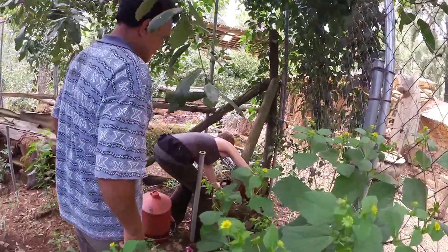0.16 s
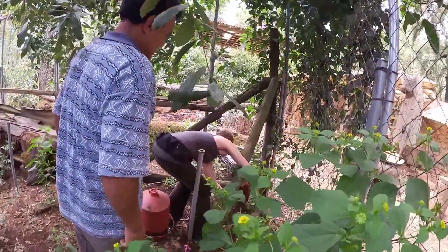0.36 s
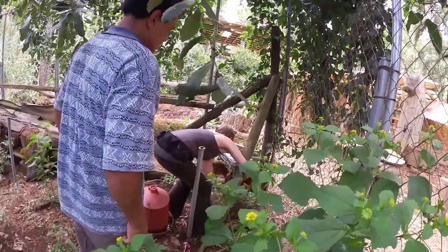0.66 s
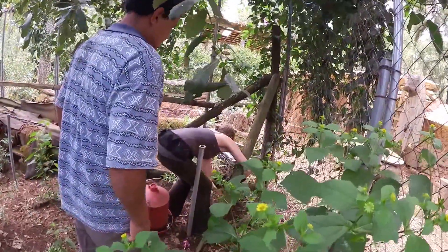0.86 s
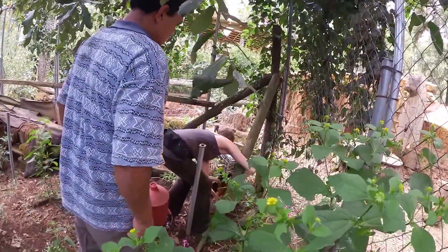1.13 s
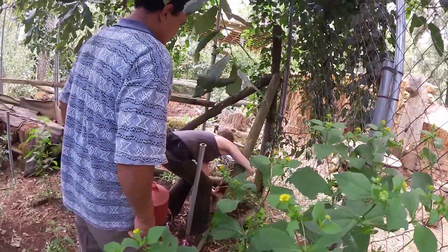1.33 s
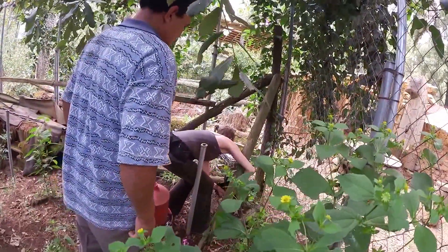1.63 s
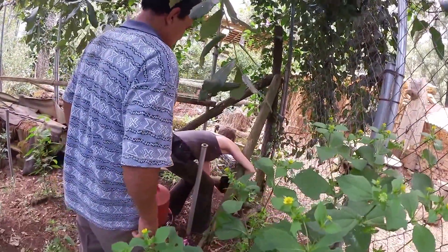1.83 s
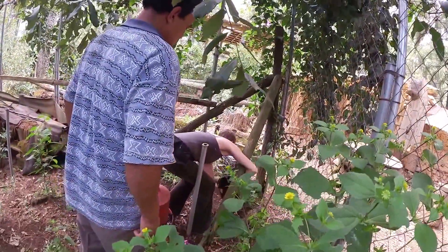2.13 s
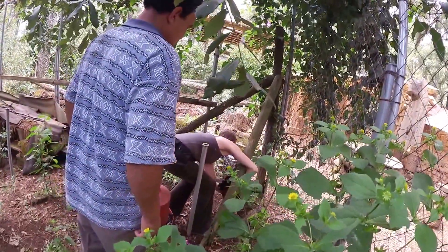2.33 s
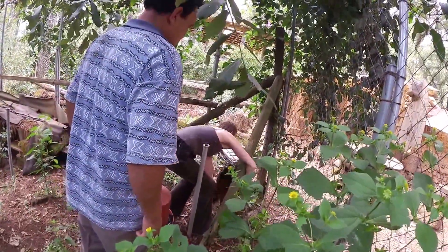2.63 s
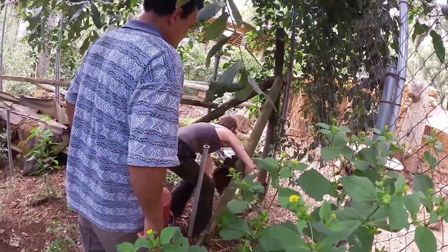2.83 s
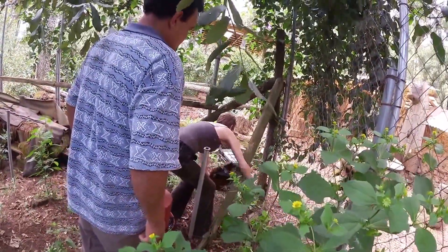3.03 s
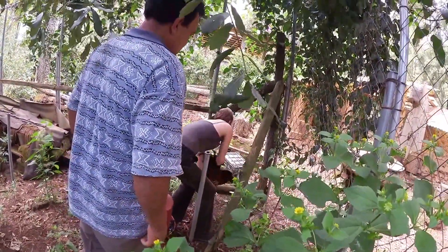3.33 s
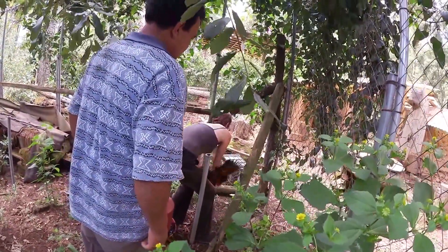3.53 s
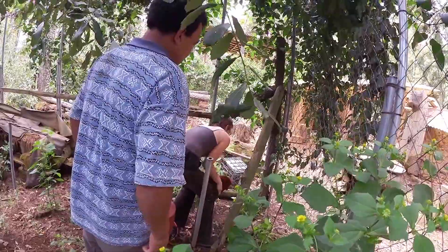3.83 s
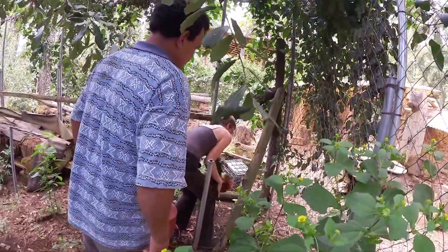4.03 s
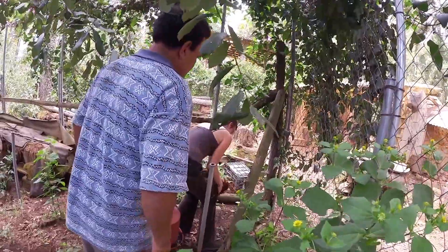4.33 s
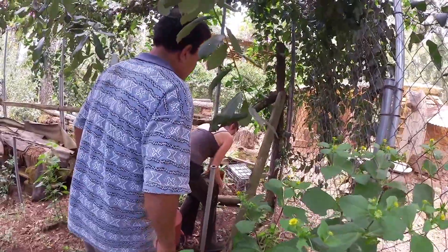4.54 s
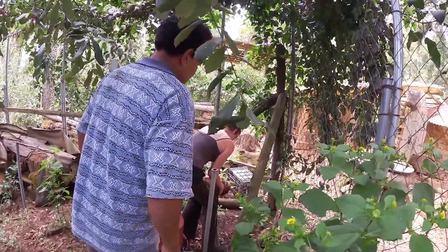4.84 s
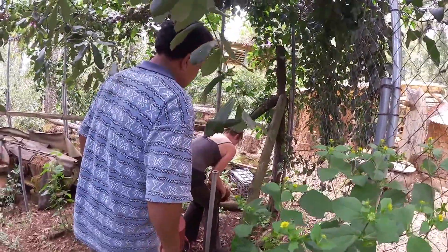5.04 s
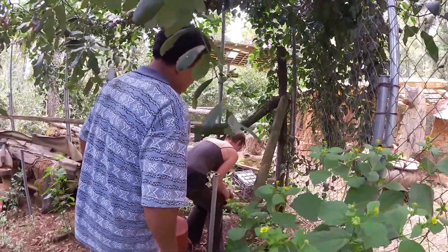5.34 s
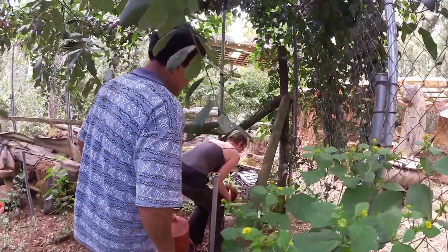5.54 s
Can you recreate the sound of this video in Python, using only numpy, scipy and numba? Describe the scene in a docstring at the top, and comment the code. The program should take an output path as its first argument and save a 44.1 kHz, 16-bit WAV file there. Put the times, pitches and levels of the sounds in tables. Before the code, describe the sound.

A held rooster gives six harsh, distressed squawks a few metres from a small camera. The first two are short and close together; the later ones stretch to over half a second and end in loud, strained peaks. Between them dry leaves rustle under feet and flapping wings, twigs snap, and the body bumps the ground. A short dull echo and faint air hiss place it in an open leafy pen.

```python
"""In a leafy pen a rooster squawks six times, a few metres from a small camera.
Its voice jumps between clean whistles, half lines and hoarse rasp: wavy partials, noisy puffs of air
and pulses that ring in throat, beak and windpipe. Wings and feet stir dry leaves, made of tiny cracks and
brushing noise; twigs snap and the body knocks the ground as brief rings. The yard answers with a short
noise-made echo, over a quiet hiss of air."""
import sys
import numpy as np
from scipy import signal
from scipy.fft import rfft, irfft
from scipy.io import wavfile
from scipy.ndimage import uniform_filter1d
from numba import njit

SR = 44100
rng = np.random.default_rng(int(sys.argv[2]) if len(sys.argv) > 2 else 0)


def wav_record(signal):
    """Record a signal, one row per channel, as 16-bit PCM in the file named by sys.argv[1]."""
    frames = np.transpose(np.atleast_2d(signal))
    bounded = np.clip(frames, -1, 1)
    # unit amplitude maps onto the largest positive 16-bit level
    quanta = np.round(bounded * 32767).astype(np.int16)
    wavfile.write(sys.argv[1], SR, quanta)


N = 250929

# How hard the bird pushes, one curve per cry. Each row: time in seconds, effort in dB,
# beak ring over the effort in dB, windpipe ring over the effort in dB.
EFFORT = [
    [(0.0, -23.5, -5.5, -17), (0.03, -28, -4.5, -13), (0.074, -17.5, -12, -15.5), (0.09, -17.5, -22.5, -21),
     (0.112, -15.5, -13, -12), (0.138, -17, -9.5, -10), (0.16, -20, -25, -14.5), (0.172, -32, -20, -14),
     (0.2, -48, -22, -18)],
    [(0.413, -29.5, 0, -27), (0.425, -15.5, -19, -18.5), (0.439, -32.5, -6, -10), (0.469, -39.5, -1.5, -8),
     (0.511, -27, -12.5, -28), (0.613, -27.5, -13, -46), (0.625, -35, -8, -32), (0.665, -34.5, -3.5, -13),
     (0.683, -17.5, -14, -14), (0.711, -16, -21.5, -24), (0.725, -23, -25, -24), (0.75, -48, -16, -18)],
    [(1.2, -62, -2, -2), (1.218, -33.5, -18, -21), (1.23, -56, -16, 1), (1.246, -26.5, -12.5, -23),
     (1.3, -22.5, -4.5, -10.5), (1.328, -37.5, 1, -11), (1.344, -22.5, -18, -20), (1.356, -39, -7, -6),
     (1.382, -28.5, -17, -13), (1.444, -22.5, -4.5, -22), (1.536, -41, -14.5, -17),
     (1.542, -30.5, -13.5, -38), (1.668, -22.5, -33.5, -28), (1.694, -18, -13.5, -11.5),
     (1.726, -12, -30.5, -35), (1.74, -54, -24, -4), (1.75, -44, -23, -19)],
    [(2.416, -32, -20, -38), (2.422, -26.5, -22, -29), (2.432, -23.5, -15.5, -19), (2.466, -23, -17, -21.5),
     (2.53, -32, -6, -10.5), (2.558, -47, -3, -8), (2.588, -35, -11, -17), (2.74, -30.5, -6, -10.5),
     (2.782, -28, -5, -5.5), (2.816, -20, -19, -13.5), (2.868, -15.5, -12.5, -19.5), (3.026, -12, -16, -27),
     (3.044, -11.5, -17.5, -26), (3.07, -42, -18, -32)],
    [(3.579, -57, -10, -5), (3.585, -31.5, -17, -12), (3.605, -33.5, -33, -38), (3.665, -35, -4, -1.5),
     (3.687, -42, -18, -12), (3.739, -26.5, -20, -31), (3.745, -29.5, -22, -27),
     (3.843, -25.5, -13.5, -17.5), (3.873, -21.5, -21.5, -37), (3.901, -19.5, -13.5, -5.5),
     (3.927, -11, -32, -21), (3.955, -21.5, -13, -5), (3.973, -15, -13.5, -17), (3.989, -42, -14, -6),
     (3.995, -39, -15, -9)],
    [(4.499, -44, -28, -16), (4.505, -27, -21, -21), (4.527, -24, -6, -18.5), (4.621, -38, 10, -6.5),
     (4.635, -30, 5.5, -10.5), (4.783, -27, -7.5, -20), (4.837, -16.5, -12, -19), (4.853, -21.5, -9, -21),
     (4.863, -29, 8, -0.5), (4.951, -21, 0, -7), (4.969, -16, -9.5, -14.5), (5.017, -9, -24, -25.5),
     (5.033, -15.5, -8.5, -21), (5.047, -10.5, -24, -29), (5.07, -35, -3, -12)],
]

# Ways of voicing: roughness from 0 to 1, depth of the strong-weak beat from 0 to 2, cycles per beat
CLEAR, HUSKY, ROUGH, RASP = (.055, 0, 2), (.32, 0, 2), (.52, 0, 2), (.78, 0, 2)
RATTLE, HALVED, THIRDS, WARBLE = (.42, .7, 2), (.15, .8, 2), (.14, .45, 3), (.06, 1.1, 3)
SPLIT = (.36, 1.7, 2.45)  # a second, slower vibration pulls lines out on both sides


def rooster():
    """Membranes beat with jitter; partials whistle, air rasps, throat, beak and windpipe ring."""
    rasp_over_effort_db = 2.5  # before the roughness scales it
    whistle_loss_db = -4  # how far the partials give way at full roughness
    t = np.arange(N) / SR
    hz, tilt, rough, beat, cycles, throat_hz, low_hz, high_hz, top_hz = notes(t)
    effort, beak_over, pipe_over = curves(EFFORT)
    # tilt is the second partial over the first; together they keep the same power
    first = effort + whistle_loss_db * rough - 10 * np.log10(1 + undb(2 * tilt))
    second = first + tilt

    phase = 2 * np.pi * np.cumsum(hz * (1 + .12 * rough * wobble(226.36))) / SR
    slow = np.cumsum(np.gradient(phase) / cycles) + .5 * wobble(51)
    # uneven cycles; a hoarse voice also comes in gulps
    size = (1 + 0.11 * rough * wobble(84)) * undb(2.14 * rough * wobble(25.3))

    # every second or third cycle is stronger: lines beside the first partial and under the second
    side_lines = np.cos(phase - slow) + 0.29 * np.cos(phase + slow)  # weaker above than below
    whistle = undb(first) * (np.cos(phase) + beat / 4 * side_lines)
    whistle = whistle + undb(second) * (np.cos(2 * phase) + beat * np.cos(2 * phase - slow))

    # noise that swells once per cycle, and a buzz of higher partials
    puffs = rng.standard_normal(N) * np.exp(np.cos(phase))
    buzz = sum(np.cos(k * phase) * (k * hz < 15000) for k in range(3, 24))
    pulses = (1 + beat * np.cos(slow)) * buzz
    # the upper voice is rougher when the second partial leads
    breath = rough + .11 / (1 + undb(-2 * tilt))
    drive = (1 - breath) * unit(pulses) + 3.8 * breath * unit(puffs)

    throat = even(steep(puffs, throat_hz, 180.), 0.0091)
    hoarse = undb(effort + rasp_over_effort_db) * rough * throat
    beak_width_hz = 345
    mouth = steep(drive, low_hz, beak_width_hz) + 0.83 * steep(drive, high_hz, beak_width_hz)
    pipe = windpipe(drive + .13 * unit(puffs), top_hz)  # the treble is breathier

    voice = np.sqrt(2) * whistle + hoarse
    voice = voice + undb(effort + beak_over) * even(mouth, 0.02)
    voice = voice + undb(effort + pipe_over) * even(pipe, 0.02)
    # silent between cries, with softened edges
    on = np.any([(t >= cry[0][0]) & (t <= cry[-1][0]) for cry in EFFORT], axis=0)
    on = uniform_filter1d(1. * on, int(0.0014 * SR))
    # the small body radiates little bass
    return high_pass(on * size * voice, 4, 290.)


def windpipe(air, top_hz):
    """A tube that stretches and shortens rings at evenly spaced, unsteady pitches."""
    # Each row: time in seconds, pitch of one of the resonances in Hz.
    pipe_tuning = [(0, 5380), (.75, 5570), (1.2, 5213), (1.75, 5630), (2.8, 5573), (2.845, 6295),
                   (2.93, 7034), (3.06, 6480), (3.5, 5505), (3.88, 5518), (3.93, 6064), (3.99, 5440),
                   (4.5, 5140), (4.66, 5882), (4.85, 5142), (4.93, 5433)]
    step_hz, width_hz = 1290, 480.
    base_hz = curves([pipe_tuning])[0]
    out = np.zeros(N)
    for k in range(-2, 7):
        f = base_hz + k * step_hz + 70 * wobble(6)
        # the beak favours the resonances near its brightest place
        level_db = -6.5 * abs(f - top_hz) / step_hz + 2.5 * wobble(11.4)
        out += undb(level_db) * steep(air, f, width_hz)
    return out


def notes(t):
    """The voice breaks from note to note; within each, pitch bends through three values."""
    # Each row: start in seconds, pitch at start, middle and end in Hz, second partial over first
    # at start and at end in dB, throat, lower beak and upper beak resonance in Hz,
    # brightest treble in Hz, voicing (roughness 0-1, beat depth 0-2, cycles per beat).
    note_rows = [ (0, 757, 742, 672, -3, -11, 678, 2160, 2820, 6640, RASP),
                 (.045, 665, 630, 638, -22, -21, 650, 1750, 2970, 4250, HUSKY),
                 (.068, 631, 627, 642, -21, -20, 665, 1800, 3200, 6100, CLEAR),
                 (.092, 680, 720, 669, -17.5, -6.5, 790, 1930, 3500, 5750, CLEAR),
                 (0.154, 701, 705, 688, -25, -22, 882, 1950, 3500, 4300, RASP),
                 (0.413, 497, 489, 466, 18, 1, 1031, 2047, 2820, 5434, HUSKY),
                 (.445, 793.6, 745, 701, -14, -14, 759, 1657, 2000, 6400, RATTLE),
                 (0.55, 698.5, 740, 709, -17, -13, 610, 1847, 1954, 6540, RATTLE),
                 (.62, 607.6, 602, 595.6, -13, -14, 680, 1880, 2600, 5860, CLEAR),
                 (.675, 522, 505, 442, -15.5, 13.5, 910, 1905, 2850, 4900, CLEAR),
                 (0.711, 804, 808, 781, -14, -37, 848, 2050, 2850, 5300, ROUGH),
                 (1.199, 549, 549, 545.8, -11, -10.5, 768.4, 1809, 2570, 6620, RASP),
                 (1.241, 591.6, 571.7, 584.7, -4, 9, 1098, 1870, 3086, 6300, RATTLE),
                 (1.335, 1078, 1030, 1069, -33, -23, 967, 1940, 3248, 6400, SPLIT),
                 (1.425, 560.7, 565.2, 563, -6, -3, 1054, 2890, 3080, 6700, HUSKY),
                 (1.46, 997.5, 944.6, 802, -6, -18, 900, 2800, 3100, 6500, ROUGH),
                 (1.51, 788, 795, 823.5, -9, -37, 684, 2029, 2750, 6120, RATTLE),
                 (1.61, 629.3, 627, 621, -36, -33, 620, 2050, 2520, 6190, CLEAR),
                 (1.64, 621, 612, 615.6, -21, -37, 624, 2120, 2520, 6030, WARBLE),
                 (1.686, 510, 502, 485, 3, 12, 955, 2030, 2640, 6000, CLEAR),
                 (1.72, 894.3, 910, 902, -55, -30, 860, 2070, 2650, 5740, ROUGH),
                 (2.415, 1089, 1070, 1040, -19, -32, 1044, 1600, 2944, 4330, SPLIT),
                 (2.48, 1052, 1001, 952.4, -33, -31, 978.6, 2136, 2967, 7850, SPLIT),
                 (2.53, 478, 449, 464, 4, 0, 748, 2054, 2875, 7760, CLEAR),
                 (2.6, 463.3, 545, 571, -6, -22, 566.3, 1632, 2770, 7500, RATTLE),
                 (2.81, 534, 545, 553.5, -2.5, 7, 893.6, 2087, 2710, 7195, HALVED),
                 (2.86, 550, 556, 530.8, 10, 18.5, 958, 2129, 3048, 5290, THIRDS),
                 (3.048, 882, 869, 862, -25, -32, 985, 2165, 3039, 5490, ROUGH),
                 (3.577, 1071, 995, 913, -18, -25, 943, 2280, 2940, 6890, CLEAR),
                 (3.66, 915, 855, 878, -18, -25, 881, 1913, 2470, 6780, RATTLE),
                 (3.724, 835, 800, 712.5, -19, -19, 770.5, 1670, 2220, 6880, RATTLE),
                 (3.82, 642, 621.3, 614, -25, -19, 668, 1885, 2300, 6950, HUSKY),
                 (3.855, 614.2, 612.7, 614.3, -19, -20, 647, 1850, 2477, 6917, CLEAR),
                 (3.884, 616, 635, 651.4, -37, -16, 639.5, 1929, 2896, 4509, CLEAR),
                 (3.932, 570.5, 563, 560, -56, 0, 719.5, 1730, 2250, 7170, CLEAR),
                 (3.96, 764, 782, 785.2, -26, -38, 800, 1350, 3483, 6540, RASP),
                 (4.497, 641.6, 620, 622, -34, -32, 700, 2192, 3015, 6473, ROUGH),
                 (4.57, 629.2, 632, 652.4, -26, -51, 845.7, 2075, 2882, 7034, RASP),
                 (4.682, 632.1, 690, 706.4, -23, -23, 785, 2498, 2850, 6940, RASP),
                 (4.79, 699.7, 688, 689.5, -19, -20, 710, 2594, 3027, 6528, ROUGH),
                 (4.858, 531, 533, 531.8, -2, 13, 830.6, 2614, 2970, 6040, HALVED),
                 (4.906, 532.3, 533.2, 530.8, 1, 16.5, 873.4, 2247, 3140, 5557, HALVED),
                 (4.97, 536.6, 520, 502.3, 15, 38, 948, 2176, 3349, 5546, CLEAR),
                 (5.036, 527, 528, 518.3, 17, 21, 1038, 2103, 3490, 5500, HUSKY),
                 (5.049, 833, 810, 790, -18, -30, 1009, 2130, 3630, 5500, ROUGH), ]
    break_s, glide_s = .002, .009  # the membranes jump quickly, neck and beak follow more slowly
    rows = np.array([row[:-1] + row[-1] for row in note_rows], float)
    # a note lasts until the next one or the end of the cry
    ends = np.array([cry[-1][0] for cry in EFFORT] + [t[-1] + 1])
    cry_end = ends[np.searchsorted(ends, rows[:, 0], "right")]
    stop = np.minimum(np.append(rows[1:, 0], np.inf), cry_end)
    k = np.maximum(np.searchsorted(rows[:, 0], t, "right") - 1, 0)
    start, a, b, c, tilt, tilt_end, throat, low, high, top, rough, beat, cycles = rows[k].T
    u = np.clip((t - start) / (stop[k] - start), 0, 1)  # progress through the note
    hz = a * (1 - u) * (1 - 2 * u) + 4 * b * u * (1 - u) + c * u * (2 * u - 1)
    tilt = tilt + u * (tilt_end - tilt)
    quick = [uniform_filter1d(v, int(break_s * SR) + 1) for v in (hz, tilt, rough, beat)]
    gliding = [uniform_filter1d(v, int(glide_s * SR) + 1) for v in (throat, low, high, top)]
    return quick + [cycles] + gliding


def stir():
    """Wings and feet set the gains of leaves and thuds: a shuffle with flaps that swell and fade."""
    # Feet in the litter. Each row: time in seconds, level of the leaves in dB.
    shuffle = [(0, -43), (.75, -46.5), (.97, -53), (1.2, -59), (1.7, -48), (1.9, -65.5), (2.4, -59.5),
               (3.07, -45), (3.55, -48), (4.0, -42.5), (4.13, -52), (4.38, -46.5), (5.08, -48.5),
               (5.2, -52), (5.45, -47.5), (5.69, -74)]
    # Wing beats and kicks. Each row: loudest moment in seconds, rise in seconds, fall in seconds,
    # leaves in dB, thud in dB; rise and fall are the times to change by 15 dB.
    flaps = [(.294, 0.13, .11, -31.5, -44), (.78, 0.088, 0.097, -43.5, -51), (1.1, 0.1, 0.064, -41.5, -50),
             (1.235, 0.039, 0.14, -45, -43), (1.4, 0.18, 0.089, -33.5, -37.5),
             (1.64, 0.14, .04, -46.5, -45), (2.0, 0.017, 0.097, -49, -68), (3.11, 0.045, 0.16, -45.5, -98),
             (3.555, 0.02, 0.11, -48, -43.5), (3.66, 0.037, 0.047, -30, -36),
             (4.415, 0.062, .09, -42.5, -44.5), (5.58, 0.073, 0.13, -42, -52)]
    t = np.arange(N) / SR
    leaf = undb(curves([shuffle])[0])
    thud = leaf * undb(-8.5)
    for s, rise, fall, leaf_db, thud_db in flaps:
        shape = undb(-15 * np.where(t < s, (s - t) / rise, (t - s) / fall))
        leaf = np.hypot(leaf, undb(leaf_db) * shape)
        thud = np.hypot(thud, undb(thud_db) * shape)
    return leaf, thud


def leaves():
    """Dense tiny cracks of different size over a softer brushing."""
    # Tone of dry leaves. Each row: frequency in Hz, relative level in dB per Hz.
    leaf_tone = [(180, -59), (300, -4.5), (937, 1), (1070, 0), (2070, -2.5), (3130, -3), (8010, -1.5),
                 (11000, -8.5), (15500, -28.5)]
    happens = rng.random(N) < 2500 / SR  # about 2500 cracks per second
    extra_db = np.minimum(6.9 * rng.exponential(size=N), 14)
    cracks = happens * rng.standard_normal(N) * undb(extra_db)
    brushing = 1.8 * rng.standard_normal(N)
    return unit(colour(unit(cracks) + brushing, leaf_tone)) * undb(1.2 * wobble(42))


def thud_noise():
    """Dull thuds: noise through a broad low resonance."""
    return unit(steep(rng.standard_normal(N), 218.0, 407.0))


def blows():
    """Snapping twigs and a body knocking the ground, each a ring that dies at once."""
    # Twig snaps. Each row: time in seconds, level in dB, ring in Hz.
    snaps = [(0.2477, -17, 1850), (0.2578, -12, 3290), (0.288, -6.5, 3160), (0.295, -11, 3060),
             (0.3092, -13, 3610), (0.3275, -16.5, 1670), (0.3427, -7.5, 4010), (0.4324, -12, 2235),
             (0.4904, -14, 1768), (0.9122, -22, 4280), (0.9548, -25.5, 7340), (1.0932, -13.5, 1670),
             (3.3344, -30, 2003), (3.6518, -2.5, 7280), (3.6618, -22, 5346), (4.5308, -13, 2967)]
    # Knocks of the body on the ground. Each row: time in seconds, level in dB, ring in Hz.
    knocks = [(0.273, -37, 205), (1.09, -34.5, 258), (3.129, -34, 342.3), (3.555, -35, 216.7),
              (3.664, -32, 154.5), (4.262, -32, 605), (4.28, -35, 490), (4.407, -23.5, 434),
              (4.469, -45, 677)]
    return high_pass(hits(snaps, cycles=1.3) + hits(knocks, cycles=2.2), 2, 110.)


def hits(table, cycles):
    """Short rings that die in a few cycles; those above 1500 Hz are also noisy."""
    out, t = np.zeros(N), np.arange(2000) / SR
    for s, db, hz in table:
        noise = rng.standard_normal(len(t))
        ring = np.sin(2 * np.pi * hz * t) + 0.2 * noise * (hz > 1500)
        ring = ring * np.exp(-t * hz / cycles) * np.minimum(t * hz / 2, 1)  # two-cycle onset
        i = int(s * SR)
        out[i:i + len(t)] += undb(db) * ring[:N - i]
    return out


def yard(x):
    """Close scatter widens the sound; fence, shed and trunks return a dull, quickly dying echo."""
    echo_db, echo_t60_s, echo_top_hz = -23.5, 0.33, 2320  # T60: time to fall by 60 dB
    scatter_db = -10.5
    t = np.arange(SR // 2) / SR
    tail = rng.standard_normal((2, len(t))) * undb(-60 * t / echo_t60_s) * (t > .006)
    tail = tail + 0.28 * tail[::-1]  # the sides share a little
    tail = signal.sosfilt(signal.butter(1, echo_top_hz, fs=SR, output="sos"), tail)
    tail = undb(echo_db) * tail / np.sqrt(np.sum(tail ** 2) / 2)
    # scatter from leaves and posts that differs between the sides
    bright = np.diff(rng.standard_normal(len(t) + 1)) * np.exp(-t / 0.0046)
    full = 0.26 * rng.standard_normal(len(t)) * np.exp(-t / 0.013)
    close = (bright + full) * (t > .001)
    close = undb(scatter_db) * close / np.sqrt(np.sum(close ** 2))
    tail = tail + close * np.array([[1], [-1]])
    return signal.fftconvolve(x[None], tail, axes=1)[:, :N]


def air_hiss():
    """The quiet air of the yard: steady noise shaped by a spectrum."""
    # Tone of the air. Each row: frequency in Hz, relative level in dB per Hz.
    air_tone = [(15, -49), (25, -27), (86, -2), (246, -7.5), (359, 1.5), (421, -10.5), (1020, -5),
                (1750, -17.5), (7700, -14.5), (11500, -22), (14300, -37), (15500, -71)]
    return unit(colour(rng.standard_normal(N), air_tone))


def undb(db):
    """Gain of a level in dB."""
    return 10 ** (np.asarray(db) / 20)


def unit(x):
    """Scaled to an average strength (rms) of 1."""
    return x / np.sqrt(np.mean(x ** 2))


def even(x, span_s):
    """Scaled to rms 1 over a sliding span."""
    return x / np.sqrt(uniform_filter1d(x ** 2, int(span_s * SR)) + 1e-12)


@njit
def svf(x, hz, width):
    """State-variable band-pass whose centre moves, gain 1 at the centre."""
    y, b, l = np.empty(len(x)), 0., 0.  # output, band state, low state
    for i in range(len(x)):
        g, k = np.tan(np.pi * hz[i] / SR), width / hz[i]
        v = (b + g * (x[i] - l)) / (1 + g * (g + k))
        b, l, y[i] = 2 * v - b, l + 2 * g * v, k * v
    return y


def steep(x, hz, width_hz):
    """A resonance applied twice, so its sides fall faster."""
    hz = np.clip(hz + np.zeros(N), 30, 18000)
    return svf(svf(x, hz, width_hz), hz, width_hz)


def high_pass(x, order, hz):
    """Weakens what lies below a frequency."""
    return signal.sosfilt(signal.butter(order, hz, "high", fs=SR, output="sos"), x)


def wobble(hz):
    """Smooth chance up to a rate, rms 1."""
    return unit(signal.sosfilt(signal.butter(2, hz, fs=SR, output="sos"), rng.standard_normal(N)))


def colour(x, points):
    """Filter by a spectrum of (Hz, dB) points."""
    hz, db = np.transpose(points)
    f = np.arange(N // 2 + 1) * SR / N + 1  # plus 1 Hz keeps the logarithm finite
    return irfft(rfft(x) * undb(np.interp(np.log(f), np.log(hz), db)), N)


def wide(make, side_db):
    """Left and right from a shared part and an unrelated part with weakened bass."""
    shared = make()
    side = undb(side_db) * high_pass(make(), 1, 150.)
    return shared + side * np.array([[1], [-1]])


def curves(tables):
    """Columns of (s, ..) rows as one value per sample."""
    s, *columns = np.concatenate([np.array(v, float) for v in tables]).T
    return [np.interp(np.arange(N) / SR, s, c) for c in columns]


def scene():
    """Bird and blows with their echo, then litter, thuds and air."""
    near = rooster() + blows()
    leaf, thud = stir()
    litter = leaf * wide(leaves, -9.5)
    thuds = thud * undb(3.13 * wobble(19.7)) * wide(thud_noise, -21)
    air = undb(-55.5) * wide(air_hiss, -6.0)
    return near + yard(near) + litter + thuds + air


def record(dry):
    """The camera cuts the top above 15.7 kHz."""
    return signal.sosfilt(signal.ellip(8, .2, 70, 15700, fs=SR, output="sos"), dry)


dry = scene()
out = record(dry)
wav_record(out)
```